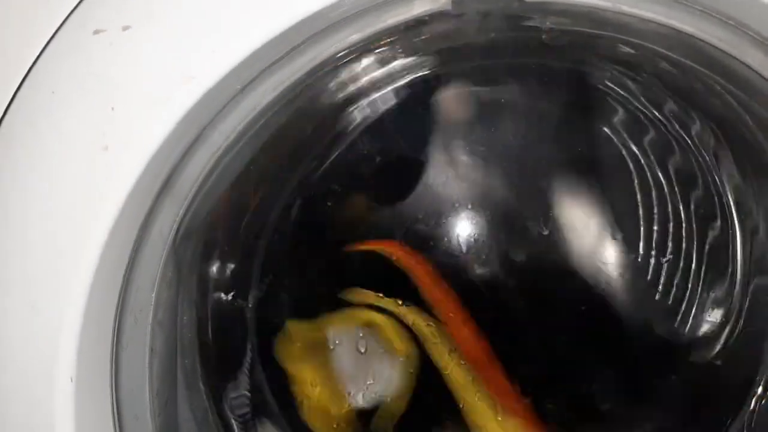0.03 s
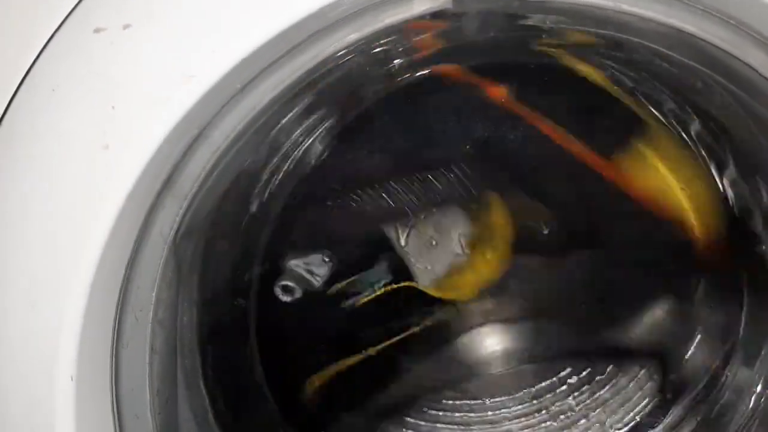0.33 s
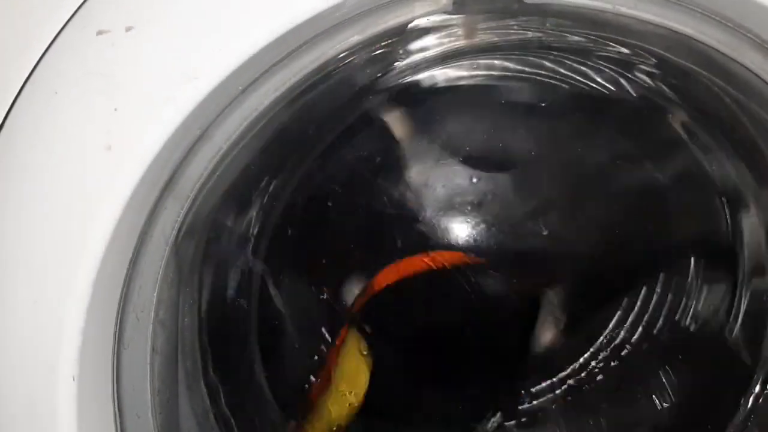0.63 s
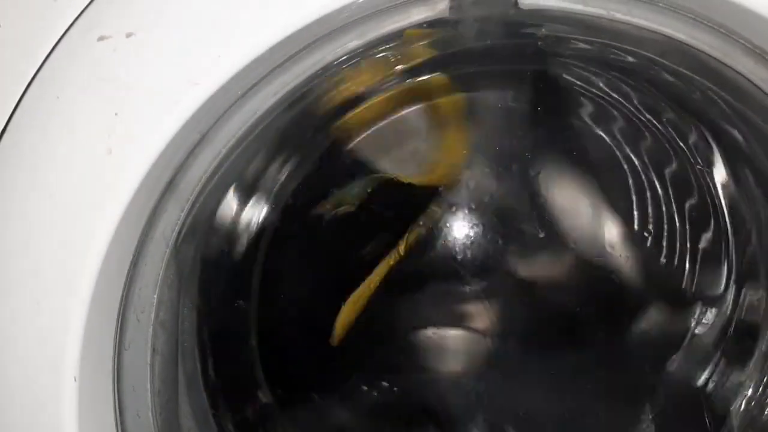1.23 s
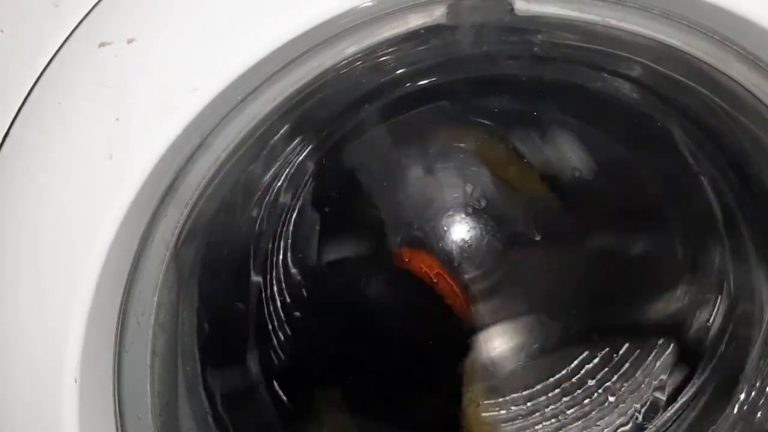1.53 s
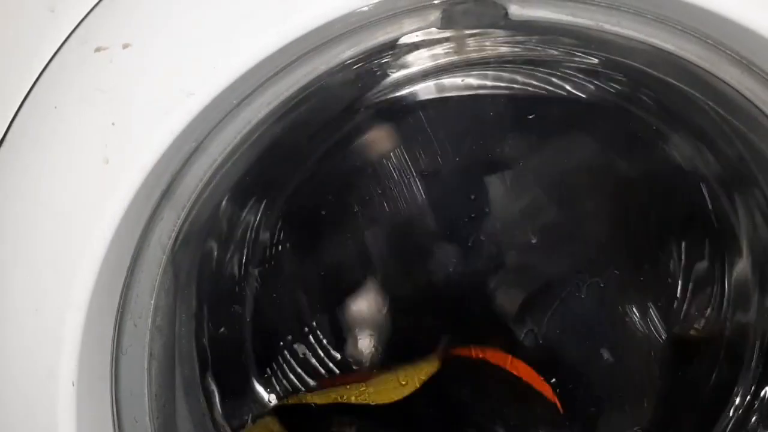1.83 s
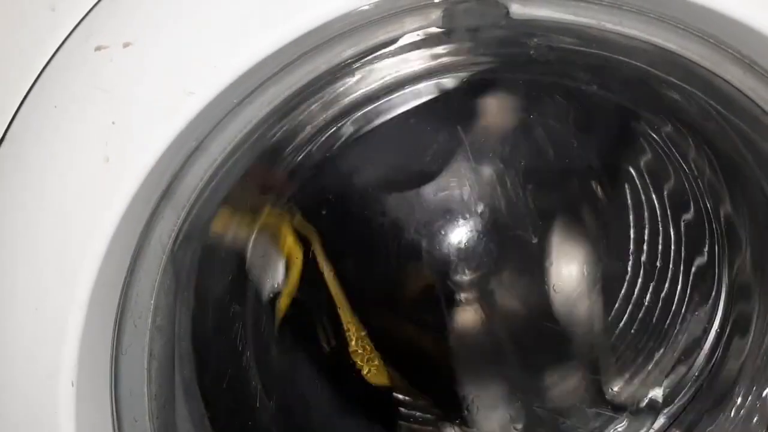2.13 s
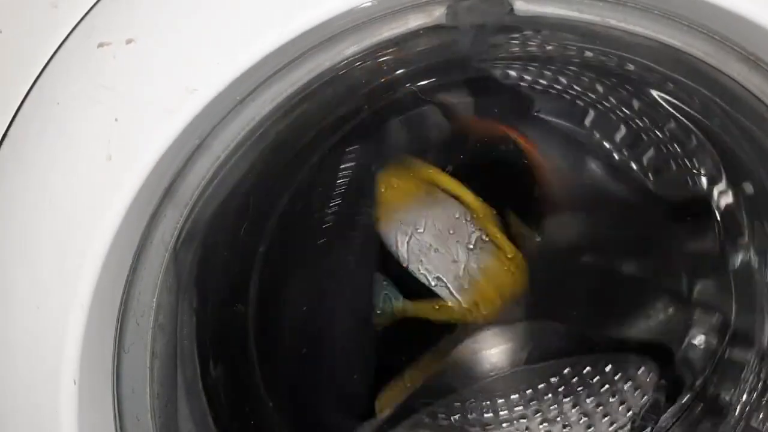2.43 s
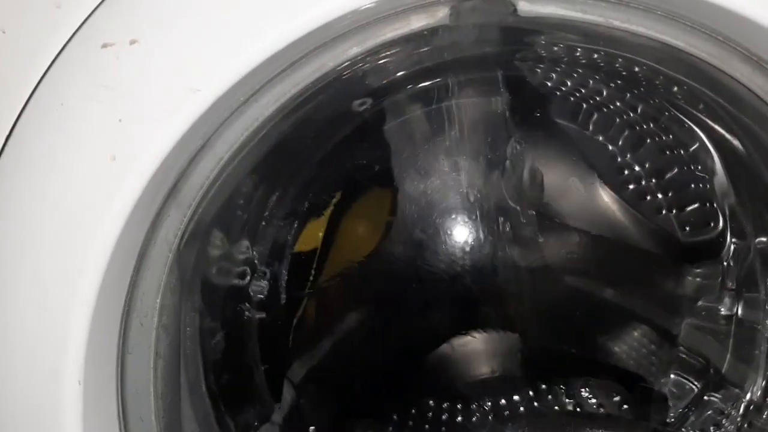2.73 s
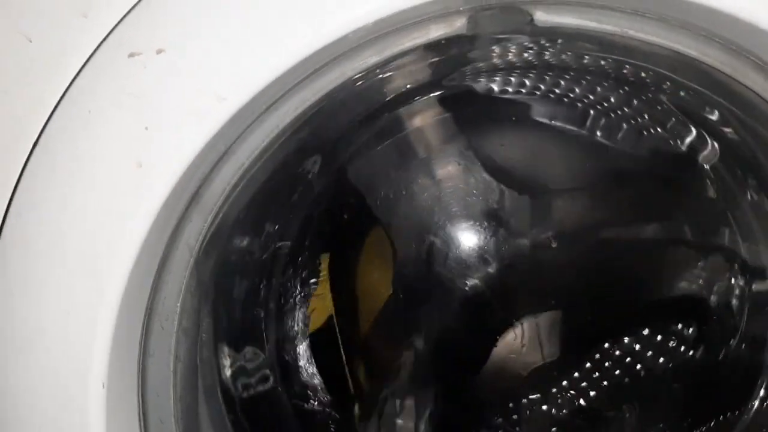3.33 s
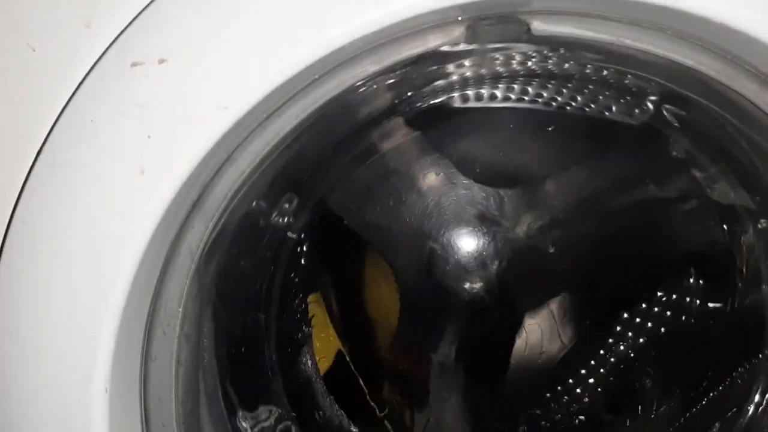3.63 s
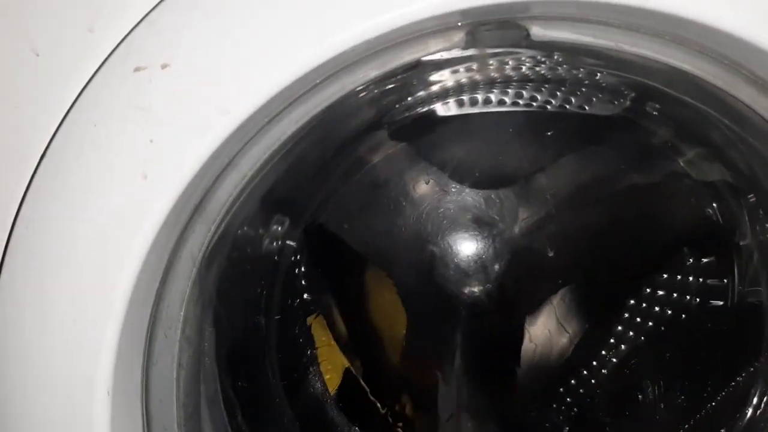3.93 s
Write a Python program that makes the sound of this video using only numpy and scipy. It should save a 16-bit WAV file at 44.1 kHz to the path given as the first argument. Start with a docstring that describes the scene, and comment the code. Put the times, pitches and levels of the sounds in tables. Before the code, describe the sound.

Close to a washing machine in a small room, tumbling shoes boom and scuff in the drum, with a few sharp knocks on the door glass. Then the thuds stop and the hissing motor drops to a low hum.

```python
"""Shoes in a washing machine

Shoes tumble in a front-loading washer, heard close to the door in a small room. Each fall booms in
the tub, rings the steel drum, slaps and scuffs. Lace tips tick, soles skid and slide, and a few heels
hit the door glass. The motor whines and hisses, then slows to a quiet hum as the shoes come to rest."""
import sys
import numpy as np
from scipy import signal
from scipy.fft import rfft, irfft
from scipy.io import wavfile
from scipy.ndimage import uniform_filter1d

SR = 44100
rng = np.random.default_rng(int(sys.argv[2]) if len(sys.argv) > 2 else 0)


def transcribe(signal):
    """Save signal, clipped to [-1, 1], as a 16-bit WAV file at the path in sys.argv[1]."""
    frames = np.atleast_2d(signal).T
    limited = np.clip(frames, -1, 1)
    pcm = np.round(limited * 32767).astype(np.int16)
    wavfile.write(sys.argv[1], SR, pcm)


N = 176400
T = np.arange(N) / SR
HIT_SAMPLES = SR // 2
AGE = T[:HIT_SAMPLES]  # seconds since a hit began

# Shoes landing: start_s, swell_s, fade_s, boom_hz, boom_db, ring_hz, ring_db, slap_db, scuff_db
FALLS = [(0.0, 0.0035, 0.051, 137, -22, 290, -33.5, -36.5, -47),
         (.051, 0.0051, 0.013, 125, -17, 256, -25, -26.5, -39.5),
         (0.097, 0.0079, 0.052, 131, -23, 327, -35, -55, -49),
         (0.161, 0.0088, 0.023, 152, -26, 266, -31, -64, -50),
         (0.173, 0.0041, 0.018, 165, -46, 367, -33.5, -27, -37),
         (0.275, 0.012, 0.019, 76, -33.5, 358, -38.5, -41.5, -65),
         (0.405, 0.0091, 0.014, 102, -17, 360, -26.5, -37.5, -63),
         (.435, 0.013, 0.16, 113, -26, 328, -35.5, -46, -53.5),
         (.601, 0.0066, 0.022, 132, -25, 330, -23.5, -33.5, -41.5),
         (.628, 0.0045, 0.019, 158, -36, 400, -20.5, -46, -49),
         (0.643, 0.002, 0.0053, 138, -13.5, 380, -20, -52, -32.5),
         (0.665, 0.014, 0.0095, 124, -23, 397, -25.5, -48, -46),
         (.702, 0.0026, 0.037, 160, -24, 330, -23.5, -32.5, -43.5),
         (0.732, 0.006, 0.26, 136, -21, 285, -29.5, -40, -46),
         (0.836, 0.0091, 0.031, 99, -40, 280, -29.5, -33.5, -44),
         (.868, 0.011, 0.016, 150, -30.5, 270, -20.5, -40, -40),
         (.940, 0.0048, 0.01, 134, -39, 261, -25.5, -32.5, -45.5),
         (1.038, 0.01, 0.0049, 148, -26, 380, -25.5, -44, -57),
         (1.051, 0.0094, 0.064, 137, -17, 337, -27, -34, -45),
         (1.107, 0.012, 0.096, 145, -58, 246, -32.5, -57, -44.5),
         (1.299, 0.011, 0.031, 126, -19.5, 340, -24.5, -30, -41.5),
         (1.327, 0.013, 0.046, 147, -22, 344, -29.5, -37, -47),
         (1.363, 0.0052, 0.02, 136, -35, 338, -24, -30.5, -39),
         (1.39, 0.0087, 0.026, 128, -22, 353, -28.5, -40.5, -46.5),
         (1.528, 0.0066, 0.034, 150, -51, 340, -21.5, -27.5, -37),
         (1.544, 0.013, 0.0055, 152, -18.5, 255, -19.5, -53, -41),
         (1.608, 0.01, 0.032, 94.4, -15, 286, -27, -40, -38.5),
         (1.675, 0.012, 0.011, 128, -40, 247, -23.5, -40, -51),
         (1.726, 0.023, 0.024, 136, -34.5, 306, -47, -44, -40.5),
         (1.913, 0.019, 0.029, 136, -31, 348, -34, -39, -57),
         (1.953, 0.021, 0.0096, 140, -18.5, 314, -30, -31, -44),
         (1.974, 0.01, 0.022, 140, -43, 332, -56, -27.5, -31.5),
         (1.984, 0.0059, 0.0047, 160, -24, 280, -14.5, -31.5, -50),
         (2.045, 0.024, 0.068, 166, -29.5, 300, -35, -36, -46),
         (2.099, 0.003, 0.017, 160, -31.5, 304, -23, -30.5, -35.5),
         (2.110, 0.005, 0.0083, 157, -18, 310, -19.5, -27, -46),
         (2.359, 0.0052, 0.029, 148, -43, 264, -25.5, -39.5, -47),
         (2.377, 0.016, 0.012, 93, -25.5, 278, -63, -45, -47),
         (2.624, 0.0077, 0.04, 90.5, -25, 350, -28.5, -34, -40.5),
         (2.664, 0.023, 0.025, 85, -33, 357, -34.5, -36, -45),
         (2.753, 0.015, 0.022, 160, -37, 354, -34, -38, -44.5),
         (2.780, 0.007, 0.012, 190, -17, 266, -24, -28.5, -39),
         (2.785, 0.0055, 0.0079, 63, -24.5, 240, -30, -31, -58),
         (2.832, 0.0059, 0.032, 169, -22, 330, -38.5, -40, -47.5),
         (2.881, 0.0053, 0.015, 87, -26, 298, -39, -40, -42)]
# The notes each part rings with, dying by 60 dB in ring_s: pitch_hz, ring_s, level_db
TUB_NOTES = [(62, 0.38, -7.5), (81.3, 0.25, -3), (96.3, 0.11, 4), (125.6, 0.23, -2), (143.4, 0.22, 3),
             (170, 0.17, -6)]
DRUM_NOTES = [(239, 0.072, -6), (278.9, 0.08, 2.5), (312.8, 0.11, -7), (370.8, 0.11, -3.5),
              (396.8, 0.096, -1), (436, 0.037, -9.5), (559, 0.1, -0.5)]
PANEL_NOTES = [(588, 0.024, -1.5), (736, 0.054, 1.5), (782.5, 0.051, 1.5), (936, 0.013, -1),
               (1004, 0.025, -15), (1049, 0.15, -18.5), (1166, 0.094, -11.5)]
SHELL_NOTES = [(1481, 0.061, -4.5), (1522, 0.064, -2), (1857, 0.048, -3), (2043, 0.061, -2.5),
               (2217, 0.039, -9), (2640, 0.065, -7), (3130, 0.015, -7.5), (3200, 0.021, -10),
               (3256, 0.045, -3.5)]
GLASS_NOTES = [(1410, 0.045, -46), (1600, 0.066, -7), (1883, 0.031, 7), (2600, 0.037, -2.5),
               (2670, 0.027, 1), (3670, 0.12, -11), (4070, 0.026, -4), (5150, 0.015, 3), (6040, .025, -12)]
# The tone of each noise, from low to high: pitch_hz, level_db
SCUFF_TONE = [(900, -23), (1500, -1.5), (2500, 1), (3500, -4.5), (5000, -8), (7000, -12), (9000, -27),
              (16000, -24)]
LEFT_HISS_TONE = [(1500, -19), (2600, -13), (4200, -15.5), (5000, -14), (6000, -16), (7500, -35),
                  (9500, -25), (12000, -20), (16000, -29)]
RIGHT_HISS_TONE = [(1500, -13), (2600, 0.5), (3300, -2.5), (4300, 3.5), (5200, 2.5), (6500, 0), (7700, 2),
                   (8100, -2), (8500, -11.5), (10000, -10), (12500, -6.5), (16000, -9.5)]
BEARING_TONE = [(30, -42), (50, -6), (66, -3), (100, -6), (128, -24), (165, -0.5), (205, 3), (260, -5.5),
                (305, 0), (330, -9.5), (395, -4.5), (455, -33), (580, -9), (680, -11), (790, -14.5),
                (900, -14.5), (1050, -14), (1400, -22.5), (2000, -30), (3500, -46), (6000, -43.5)]
ROLL_TONE = [(30, -29), (65, 16.5), (150, -17), (300, 1), (500, -7.5), (700, -40), (900, -22), (1500, -21),
             (3000, -17.5), (5000, -42)]
# How hard the motor drives, which the hiss and the drum's roll follow: time_s, level_db
MOTOR_DRIVE = [(0, -55), (1.2, -55.5), (1.9, -55), (2.33, -57), (2.42, -59.5), (2.5, -63.5), (3.0, -64.5),
               (3.45, -64), (4.0, -65)]
# Thin tones of the driven motor: pitch_hz, level_db
DRIVEN_TONES = [(3289, -66.5), (4147, -63), (5125, -73), (6096, -73), (6920, -74)]
# Ringing of the slow motor and of the cabinet: pitch_hz, width_hz, level_db
IDLE_TONES = [(3780, 120, -71.5), (4830, 900, -69.5), (7200, 130, -73)]
CABINET_TONES = [(69.1, 30, -67.5), (100.5, 20, -58.5), (567.6, 94, -59.5), (768, 89, -59), (1046, 28, -69),
                 (1490, 67, -68)]
# The motor's whine over time: time_s, pitch_hz, level_db
WHINE_PATH = [(0, 1065, -48), (.2, 1115, -55), (.36, 1075, -47), (.5, 1105, -45.5), (.6, 1075, -45),
              (.8, 1130, -46.5), (1.0, 1115, -45), (1.22, 1055, -49.5), (1.35, 1050, -59), (2.2, 1050, -80),
              (2.5, 1030, -68)]
# The motor's hum over time: time_s, level_db
HUM_LEVELS = [(0, -54), (2.55, -46.5), (3.0, -48.5), (3.5, -46), (4.0, -47.5)]
# Dry clicks of a lace tip: start_s, level_db, brightest_hz
LACE_CLICKS = [(0.0503, -33, 6260), (0.7031, -28.5, 5400)]
# Lace tips and eyelets hitting steel: start_s, level_db, pitch_hz, crack_over_ring_db
LACE_TICKS = [(0.054, -37.5, 3330, -11), (.178, -44, 3254, -4), (.556, -43, 3270, -8),
              (1.111, -39, 3240, -1.5), (1.297, -37, 3370, 2), (1.362, -36, 3180, -16),
              (1.559, -41, 3210, 1), (1.653, -40.5, 10900, 10), (1.668, -39.5, 4990, -3),
              (1.684, -37, 7600, 2), (1.979, -40, 3175, -12), (2.097, -41.5, 4800, -4),
              (2.665, -37.5, 3234, -8), (2.685, -44, 3150, 4), (2.776, -46.5, 4870, -2),
              (2.666, -49.5, 12400, -2), (2.747, -47, 3340, 8)]
# Rubber soles skidding on steel: start_s, length_s, first_hz, last_hz, level_db
SOLE_SKIDS = [(0.267, 0.045, 447, 294, -40), (0.699, 0.046, 660, 500, -36),
              (0.706, 0.041, 1083, 810, -44.5), (.852, 0.045, 684, 418, -39.5)]
# Knocks on the door glass: start_s, level_db, pitch_hz, spread_octaves
DOOR_KNOCKS = [(0.4055, -26.5, 1880, 0.84), (0.6414, -23.5, 1890, 0.99), (0.7043, -32, 2200, 0.85),
               (1.6091, -31.5, 3830, 0.43)]
# Soft slides on the drum: start_s, swell_s, fade_s, level_db
SHOE_SLIDES = [(0.543, 0.01, 0.017, -46), (2.383, 0.0032, 0.0091, -51), (3.441, 0.043, 0.04, -49.5),
               (3.679, 0.014, 0.057, -55)]

LEAN_LEFT_DB = [[1.75], [-1.75]]  # left ear, right ear


def gain(db):
    """Turn decibels into a number to multiply by."""
    return 10 ** (np.asarray(db) / 20)


def unit(x):
    """Scale a sound so its average level (rms) is 1."""
    return x / np.sqrt(np.mean(x ** 2))


def at_level(x, db):
    """Scale a hit so its loudest moment has this level."""
    power = uniform_filter1d(np.mean(np.atleast_2d(x) ** 2, axis=0), size=300)
    return gain(db) * x / np.sqrt(power.max())


def curve(rows, col=1):
    """Join the rows of a time table with straight lines."""
    rows = np.array(rows)
    return np.interp(T, rows[:, 0], rows[:, col])


def colour(x, tone):
    """Turn lows and highs up or down, following (pitch_hz, level_db) points."""
    hz, db = np.array(tone).T
    size = x.shape[-1]
    log_hz = np.log(np.fft.rfftfreq(size, 1 / SR) + 1)
    return irfft(rfft(x) * gain(np.interp(log_hz, np.log(hz), db)), size)


def wavering_tone(hz, width_hz):
    """An unsteady tone: the wider it is, the rougher it sounds."""
    rolloff = 1 + (2 * np.fft.rfftfreq(N, 1 / SR) / width_hz) ** 2
    drift_a, drift_b = irfft(rfft(rng.standard_normal((2, N))) / rolloff, N)
    phase = 2 * np.pi * np.cumsum(np.broadcast_to(hz, N)) / SR
    return unit(drift_a * np.cos(phase) + drift_b * np.sin(phase))


def noise(width):
    """Stereo noise for one hit: width 0 is the same in both ears, 1 is unrelated."""
    mid, side = rng.standard_normal((2, HIT_SAMPLES))
    return np.array([mid + width * side, mid - width * side])


def ring(force, notes, hz=1000, spread_octaves=np.inf):
    """A force sets a part's notes ringing; a small spread favours those near hz."""
    response = np.zeros(HIT_SAMPLES)
    for pitch_hz, ring_s, db in notes:
        strength = gain(db) * np.exp(-0.5 * (np.log2(pitch_hz / hz) / spread_octaves) ** 2)
        response += strength * np.sin(2 * np.pi * pitch_hz * AGE) * gain(-60 * AGE / ring_s)
    padded = 2 * HIT_SAMPLES
    return irfft(rfft(force, padded) * rfft(response, padded))[..., :HIT_SAMPLES]


def contact(swell_s, fade_s):
    """The pressure of a touch builds, then dies away."""
    return np.minimum(AGE / swell_s, 1) * np.exp(-np.maximum(AGE - swell_s, 0) / fade_s)


def add(out, start_s, x):
    """Mix a sound in at its start time."""
    i = int(start_s * SR)
    out[:, i:i + x.shape[-1]] += x[..., :N - i]


def shoe_falls():
    """Each fall is one push, then an uneven rub of sole and cloth; both make the machine ring."""
    out = np.zeros((2, N))
    push = signal.unit_impulse(HIT_SAMPLES)
    soft_sole = signal.butter(4, 520, fs=SR, output="sos")  # it hardly shakes the drum above 520 Hz
    for start_s, swell_s, fade_s, boom_hz, boom_db, ring_hz, ring_db, slap_db, scuff_db in FALLS:
        uneven = gain(3 * np.repeat(rng.standard_normal(HIT_SAMPLES // 90), 90))
        rub = contact(swell_s, fade_s) * uneven
        rub /= np.linalg.norm(rub)
        squash = np.minimum(AGE / swell_s, 1)
        tub_force = push + 0.23 * rub * noise(width=0.024)
        boom = squash * ring(tub_force, TUB_NOTES, boom_hz, spread_octaves=0.45)
        drum_force = push + 0.58 * rub * noise(width=0.19)
        drum = squash * ring(drum_force, DRUM_NOTES, ring_hz, spread_octaves=0.4)
        drum = signal.sosfilt(soft_sole, drum)
        # The slap and the scuff build faster than the boom.
        slap = ring(contact(0.63 * swell_s, fade_s) * uneven * noise(width=0.53), PANEL_NOTES)
        brush = contact(0.21 * swell_s, fade_s) * uneven
        shell = unit(ring(brush * noise(width=1), SHELL_NOTES))
        dry_scuff = unit(brush * colour(noise(width=1), SCUFF_TONE))
        scuff = at_level(shell + gain(-3) * dry_scuff, scuff_db) * gain([[-1], [1]])
        thud = at_level(boom, boom_db) + at_level(drum, ring_db)
        add(out, start_s, thud + at_level(slap, slap_db) + scuff)
    return out


def motor_hiss(flutter_hz=30.54, flutter_db=1.43):
    """The motor's hiss flutters, mostly on the right, and drops as the drive eases."""
    flutter = np.interp(T * flutter_hz, np.arange(400), rng.standard_normal(400))
    left = gain(5) * unit(colour(rng.standard_normal(N), LEFT_HISS_TONE))
    right = gain(8) * unit(colour(rng.standard_normal(N), RIGHT_HISS_TONE))
    return gain(curve(MOTOR_DRIVE) + flutter_db * flutter) * np.array([left, right])


def motor_whine(slows_at_s=2.27, changeover_s=0.14):
    """The driven motor has a rough whine and thin tones; fainter ones take over as it slows."""
    driven = 0.5 - 0.5 * np.tanh((T - slows_at_s) / changeover_s)
    singing = sum(gain(db) * wavering_tone(hz, width_hz=18) for hz, db in DRIVEN_TONES)
    idling = sum(gain(db) * wavering_tone(hz, width_hz) for hz, width_hz, db in IDLE_TONES)
    whine = np.array([wavering_tone(curve(WHINE_PATH), width_hz=61) for _ in range(2)])
    whine *= gain(curve(WHINE_PATH, col=2))
    return whine + driven * singing * gain([[-4], [4]]) + (1 - driven) * idling


def motor_hum(pitch_hz=169.7, beating_hz=197.5):
    """The motor's low, slightly rough hum beats against a weaker tone beside it."""
    steady = np.sqrt(2) * np.sin(2 * np.pi * pitch_hz * T)
    rough = 0.4 * wavering_tone(pitch_hz, width_hz=32)
    beating = gain(-11) * wavering_tone(beating_hz, width_hz=2.3)
    return gain(curve(HUM_LEVELS)) * (steady + rough + beating)


def rumble(tone):
    """Deep noise with its lows in the middle and its highs spread wide."""
    mid, side = colour(rng.standard_normal((2, N)), tone)
    side = colour(side, [(87, -22), (435, -9), (870, -1)])
    return unit(np.array([mid + side, mid - side]))


def drum_turning():
    """The bearings rumble through the cabinet; the drum rolls louder while driven."""
    cabinet = sum(gain(db) * wavering_tone(hz, width_hz) for hz, width_hz, db in CABINET_TONES)
    bearings = gain(-48.5) * rumble(BEARING_TONE)
    roll = gain(curve(MOTOR_DRIVE) + 8) * rumble(ROLL_TONE)
    return cabinet + bearings + roll


def lace_tips(swell_s=0.0005, ring_s=0.071):
    """Lace tips and eyelets hit the steel: some just click, most ring briefly."""
    out = np.zeros((2, N))
    soften = signal.butter(2, 7500, fs=SR, output="sos")
    for start_s, db, hz in LACE_CLICKS:
        click = signal.sosfilt(soften, contact(swell_s, fade_s=0.0022) * noise(width=0.7))
        click = colour(click, [(hz / 4, -14), (hz, 0), (hz * 2, -9)])
        add(out, start_s, at_level(click, db) * gain([[-4], [2]]))
    for start_s, db, hz, crack_db in LACE_TICKS:
        tone = [(hz / 4, -14), (hz, 0), (hz * 2, -12), (hz * 3, -22)]
        crack = contact(swell_s, fade_s=0.0052) * colour(noise(width=0.57), tone)
        notes = [(hz - 210, ring_s, -4), (hz, ring_s, 0), (hz + 210, ring_s, -4)]
        tick = unit(ring(crack, notes)) + gain(crack_db) * unit(crack)
        add(out, start_s, at_level(tick, db) * gain([[-6], [2]]))
    return out


def sole_skids(roughness=0.035):
    """A rubber sole sticks and slips ever more slowly, making a falling groan."""
    out = np.zeros((2, N))
    for start_s, length_s, first_hz, last_hz, db in SOLE_SKIDS:
        progress = np.linspace(0, 1, int(length_s * SR))
        wobble = unit(uniform_filter1d(rng.standard_normal(HIT_SAMPLES), size=90))[:len(progress)]
        hz = first_hz * (last_hz / first_hz) ** progress * (1 + roughness * wobble)
        groan = np.sqrt(progress) * (1 - progress) * np.sin(2 * np.pi * np.cumsum(hz) / SR)
        add(out, start_s, at_level(groan, db))
    return out


def door_knocks():
    """A heel gives the door glass a short, hard push that makes it ring."""
    out = np.zeros((2, N))
    for start_s, db, hz, spread_octaves in DOOR_KNOCKS:
        rub = contact(swell_s=0.00037, fade_s=0.0032) * noise(width=1)
        force = signal.unit_impulse(HIT_SAMPLES) + 0.14 * rub
        add(out, start_s, at_level(ring(force, GLASS_NOTES, hz, spread_octaves), db))
    return out


def shoe_slides():
    """A shoe slides along the drum with a soft brushing noise."""
    out = np.zeros((2, N))
    for start_s, swell_s, fade_s, db in SHOE_SLIDES:
        slide = contact(swell_s, fade_s) * colour(noise(width=0.82), SCUFF_TONE)
        add(out, start_s, at_level(slide, db))
    return out


def room(x, echo_s=0.79, echo_db=-18):
    """Nearby walls add a short, blurred echo."""
    tail = noise(width=0.13) * contact(swell_s=0.012, fade_s=echo_s / np.log(1000))
    tail /= np.linalg.norm(tail[0])
    return x + gain(echo_db) * signal.fftconvolve(x, tail, axes=1)[:, :N]


def scene():
    """The shoes, drum and hum sit a little to the left, over the motor's hiss and whine."""
    shoes = room(shoe_falls() + lace_tips() + sole_skids() + door_knocks() + shoe_slides())
    return (shoes + drum_turning() + motor_hum()) * gain(LEAN_LEFT_DB) + motor_hiss() + motor_whine()


def record(dry):
    """The microphones lose the deepest bass and the very top, and the left one is duller."""
    bass_cut = signal.butter(3, 46, "high", fs=SR, output="sos")
    top_cut = signal.ellip(10, 0.2, 80, 15750, fs=SR, output="sos")
    left, right = signal.sosfilt(bass_cut, dry)
    left = colour(left, [(3500, -2), (5000, -8.5), (7000, -22.5), (9500, -26), (13000, -9)])
    return signal.sosfilt(top_cut, np.array([left, right]))


dry = scene()
out = record(dry)
transcribe(out)
```